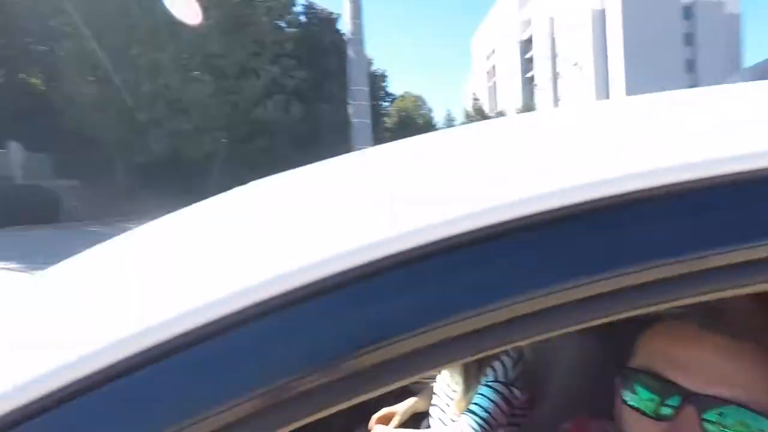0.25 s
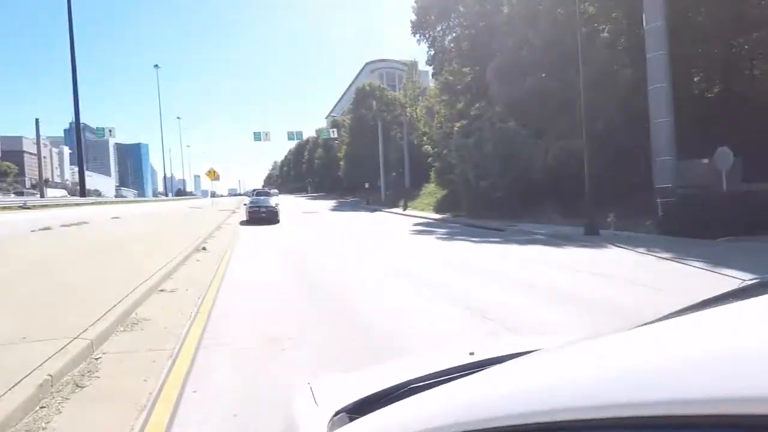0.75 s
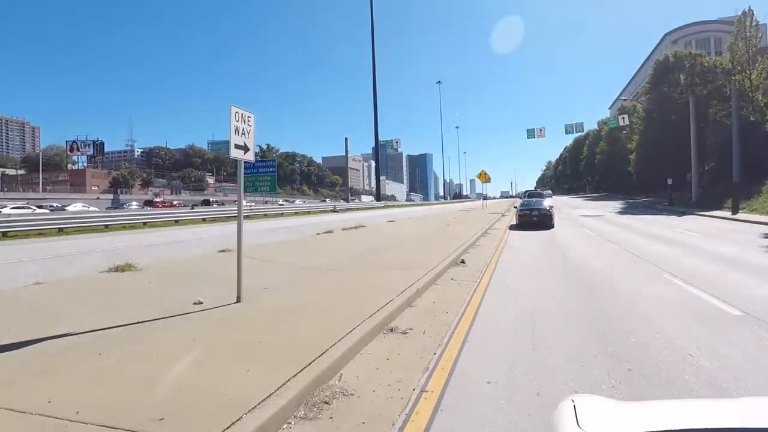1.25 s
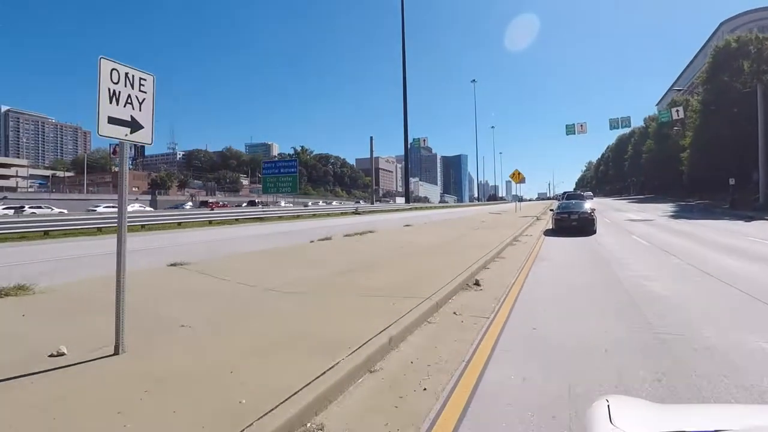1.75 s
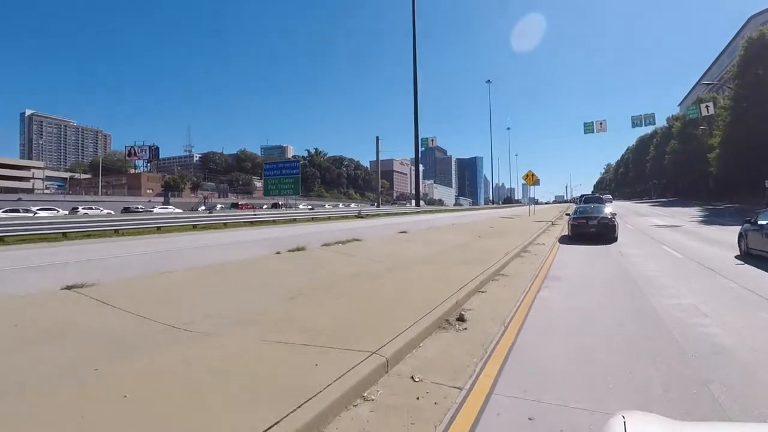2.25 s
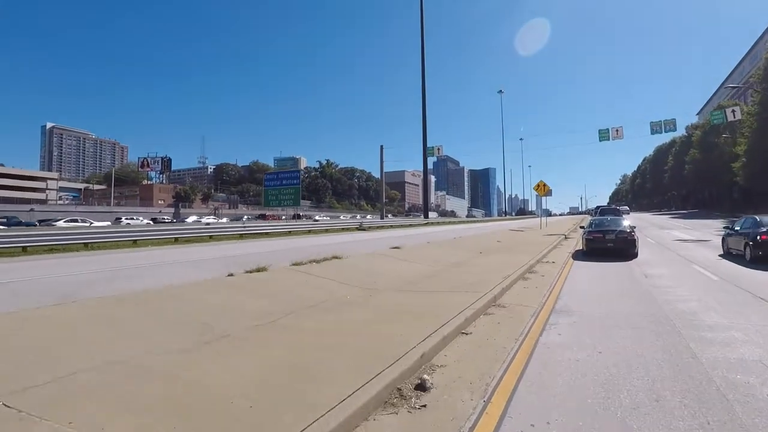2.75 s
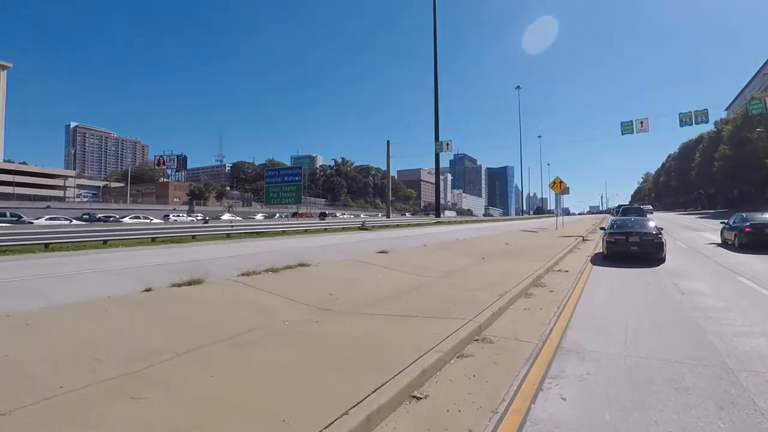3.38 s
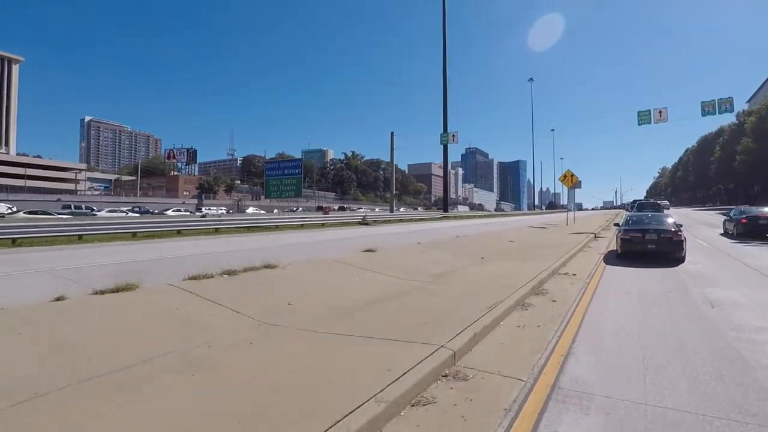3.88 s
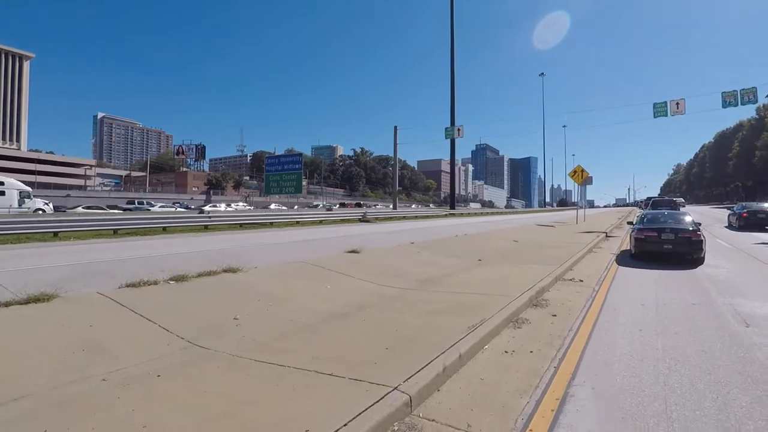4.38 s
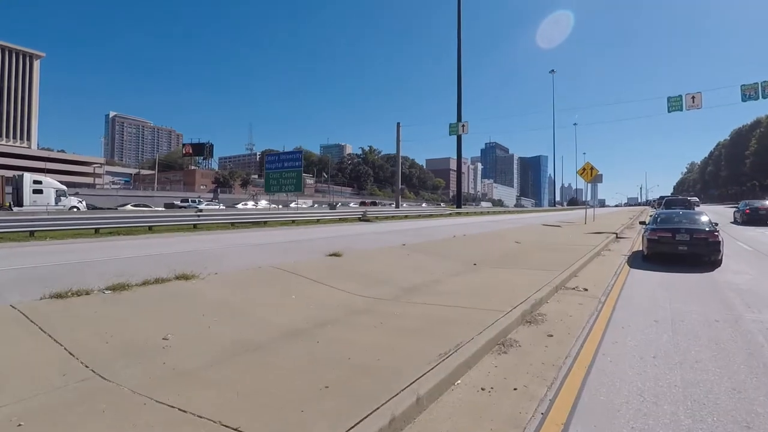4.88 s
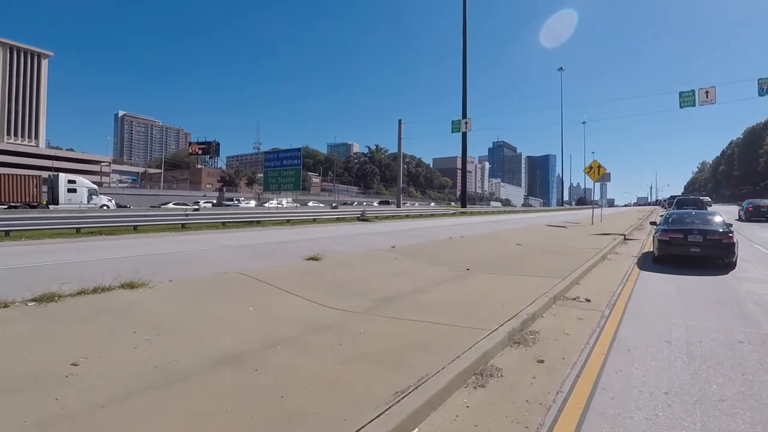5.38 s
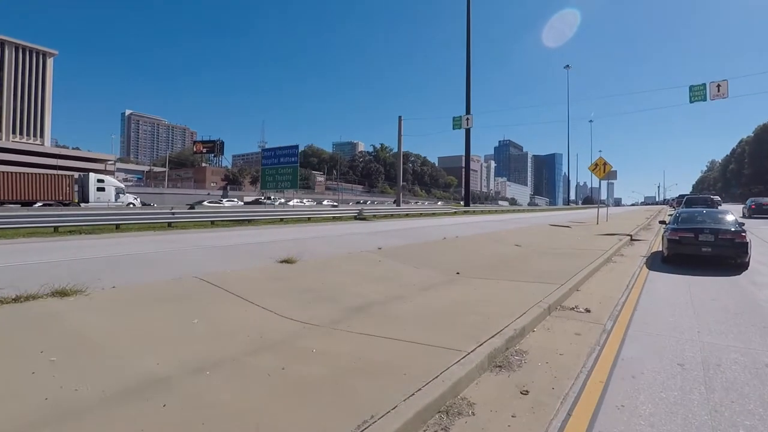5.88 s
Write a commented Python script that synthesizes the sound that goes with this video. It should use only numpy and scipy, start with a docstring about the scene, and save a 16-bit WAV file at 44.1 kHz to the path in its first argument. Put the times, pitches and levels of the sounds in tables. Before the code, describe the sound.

Wind dominates, heavy and bass-rich, pressing irregularly on an exposed microphone outdoors at the roadside. The strongest burst comes in the first half second, close to overload. A wavering engine idle and dull road rumble sit behind it. Soft tyre rushes rise after one second and again near five, separated by quieter traffic with faint high squeaks; a second engine revs up late.

```python
"""Camera held out of a van window beside a busy highway

Wind thumps and flutters on the microphone: coloured noise that follows lists of buffets and bursts, with one strong gust.
Tyre roar and hiss, heard as bands of noise, drone far away and swell as cars pass.
The van's idling engine is a stack of sine tones, a second engine revs up, and brakes squeak faintly.
The camera housing cuts two narrow notches into all but the wind, and the loudest peaks clip softly."""
import sys
import numpy as np
from scipy import signal
from scipy.fft import rfft, irfft, next_fast_len
from scipy.io import wavfile
from scipy.ndimage import uniform_filter1d, map_coordinates

SR = 44100
rng = np.random.default_rng(int(sys.argv[2]) if len(sys.argv) > 2 else 0)


def to_wav(s):
    """Save 16-bit WAV."""
    ch = np.atleast_2d(s).T  # columns
    pcm = np.round(np.clip(ch, -1, 1) * 32767)  # PCM
    wavfile.write(sys.argv[1], SR, pcm.astype(np.int16))


def convert_level_to_amplitude(level_db):
    """Map a level in decibels to its linear amplitude factor."""
    exponent = np.asarray(level_db, float) / 20
    return 10 ** exponent


N = 270024  # length in samples, about 6.12 s


def along(points, hz):
    """Reads a curve of (Hz, value) points on a log frequency axis."""
    f, v = np.transpose(points)
    return np.interp(np.log(hz + 1), np.log(f + 1), v)


def curves(rows):
    """One value per sample for each column after the time."""
    s, *cols = np.transpose(rows)
    return [np.interp(np.arange(N) / SR, s, c) for c in cols]


def unit(x):
    """Scaled to rms 1."""
    return x / np.sqrt(np.mean(x ** 2) + 1e-20)


def wobble(rate):
    """A smooth random curve through rate random points a second."""
    points = rng.standard_normal(int(N * rate / SR) + 4)
    return map_coordinates(points, [np.arange(N) * rate / SR])


def filtered(x, response):
    """x with its spectrum multiplied by a response, a function of frequency in Hz."""
    m = next_fast_len(N + SR // 2)  # spare room so that the end does not wrap to the start
    return irfft(rfft(x, m) * response(np.fft.rfftfreq(m, 1 / SR)), m)[..., :N]


def rush(spectrum, patchy_db):
    """Coloured noise of rms 1, silent outside its spectrum, with patches of random gain."""
    z = signal.stft(rng.standard_normal(N), nperseg=512)[2]
    field = uniform_filter1d(rng.standard_normal(z.shape), size=6, axis=0)
    field = uniform_filter1d(field, size=14, axis=1)
    patchy = signal.istft(z * convert_level_to_amplitude(patchy_db * unit(field)), nperseg=512)[1][:N]
    lowest, highest = spectrum[0][0], spectrum[-1][0]

    def colour(hz):
        return convert_level_to_amplitude(along(spectrum, hz)) * (hz > lowest) * (hz < highest)

    return unit(filtered(patchy, colour))


def steady(x, seconds, share):
    """Evens out the chance swells of narrow noise, so that the gusts set its level."""
    width = int(seconds * SR)
    power = np.abs(uniform_filter1d(uniform_filter1d(x ** 2, width), width))
    return unit(x / (power + 0.066) ** (np.clip(share, 0, 1) / 2))


def eddies(hz, spread):
    """Noise round a moving pitch, as wide as a share of that pitch: slow random sways read in turns."""
    turns = np.cumsum(hz) / SR
    knots = rng.standard_normal((2, 1200))
    sway = [map_coordinates(k, [turns * spread], mode="wrap") for k in knots]
    return unit(sway[0] * np.cos(2 * np.pi * turns) + sway[1] * np.sin(2 * np.pi * turns))


def lumps(rows):
    """Power of bell-shaped swells given as (s, peak dB, length s)."""
    t = np.arange(N) / SR
    return sum(convert_level_to_amplitude(2 * db) * np.exp(-(2 * (t - s) / length) ** 2) for s, db, length in rows)


def wind():
    """Eddies press on the membrane: deep thumps whose pitch wanders, a faster flutter, and one strong gust."""
    # Wind between the buffets. Each row: time in seconds, deep thump level, flutter level.
    # Both are in dB before they are stretched below.
    between = [(0, -11, -20.5), (.5, -18, -15.5), (1.0, -16.5, -18.5), (1.5, -12, -21), (1.95, -22, -12.5),
               (2.3, -21, -28.5), (2.6, -15.5, -21), (3.2, -16, -18), (4.0, -18, -18), (4.6, -15.5, -16.5),
               (5.2, -16.5, -13.5), (5.7, -21.5, -22), (6.12, -18, -29)]
    # Deep buffets; the thump's pitch glides from one to the next.
    # Each row: time in seconds, peak level in dB, length in seconds, pitch in Hz.
    buffets = [(0.117, -11, 0.074, 42.5), (0.41, -14, 0.075, 74.3), (0.831, -15, 0.076, 45.86),
               (1.148, -11, .15, 39.1), (1.461, -16, 0.097, 48.1), (1.802, -14, .07, 44.83),
               (2.005, -15, .12, 41.8), (2.297, -15, 0.16, 41.87), (2.636, -15, 0.072, 64.5),
               (2.993, -17, 0.06, 62), (3.594, -18.5, .1, 51.6), (4.248, -20, 0.17, 43.26),
               (4.657, -12.5, 0.1, 55.26), (4.806, -19, 0.053, 56.4), (5.155, -16, 0.14, 61.9),
               (5.702, -12.5, 0.068, 57.3), (5.928, -10.5, .07, 59.9), (6.053, -13, 0.089, 65.04)]
    # Bursts of flutter. Each row: time in seconds, peak level in dB.
    flaps = [(0.032, -9), (0.139, -11), (.29, -19.5), (.41, -6), (.61, -26), (0.821, -17.5), (1.031, -25),
             (2.14, -13), (2.41, -13.5), (2.579, -17), (4.3, -17.5), (4.8, -20), (5.15, -19), (6.11, -12.5)]
    # The gust as the camera is swung round; its eddies grow and slow down overall.
    # Each row: time in seconds, level in dB, pitch in Hz.
    gust_path = [(.19, -40, 290), (.24, -20, 240.2), (.29, -43, 260.4), (.32, -20.5, 300),
                 (.37, -15, 197.4), (.395, -7, 109.8), (.44, -12.5, 82.4), (.47, -42, 68.9)]
    # Colours of the thump and of the flutter. Each row: frequency in Hz, relative level in dB.
    deep_colour = [(8, -21), (18, -8.5), (28, 7), (45, -1), (75, -2), (110, -38)]
    flutter_colour = [(55, -38), (75, 8), (90, 0.5), (125, 2.5), (165, -9.5), (210, -43.5), (260, -85)]
    flap_s, sways_per_s = 0.068, 11

    thump_db, flutter_db = curves(between)
    thump_hz, = curves([(s, hz) for s, _, _, hz in buffets])
    thump = eddies(thump_hz, spread=0.4) + convert_level_to_amplitude(0.5) * rush(deep_colour, patchy_db=1.6)
    thump = steady(thump, 0.083, share=0.57)
    flutter = steady(rush(flutter_colour, patchy_db=-0.36), 0.042, share=0.75)
    gust_db, gust_hz = curves(gust_path)
    gust = steady(eddies(gust_hz, spread=0.7), 0.035, share=1.0)

    # A factor of 2 turns dB into power; the excess over 2 stretches the swings in level.
    thump_power = convert_level_to_amplitude(2.28 * (thump_db + 1.5 * wobble(sways_per_s)))
    thump_power = thump_power + lumps([row[:-1] for row in buffets])
    flutter_power = convert_level_to_amplitude(2.134 * (flutter_db + 1.5 * wobble(sways_per_s)))
    flutter_power = flutter_power + lumps([(s, db, flap_s) for s, db in flaps])
    return np.sqrt(thump_power) * thump + np.sqrt(flutter_power) * flutter + convert_level_to_amplitude(gust_db) * gust


def slap():
    """The sharpest eddy slaps the membrane: one short inward push."""
    # One row: time in seconds, peak level in dB, half width in seconds.
    sharpest = (.396, -8, .0011)
    s, db, width = sharpest
    return -convert_level_to_amplitude(db) * np.exp(-((np.arange(N) / SR - s) / width) ** 2)


def traffic():
    """Tyres near and far: upper bands swell as cars pass; all bands share a slight unevenness of the road."""
    # Upper tyre bands: high roar, whine, hiss, sizzle. Each row: far traffic in dB, passing car in dB,
    # delay of the peak in seconds, factor on the retreat time.
    upper_bands = [(-43.5, -38, -0.11, 3.25), (-47.5, -39, 0.18, 1.1), (-49, -39.5, 0.022, 0.92),
                   (-65.5, -51, -0.016, 1.03)]
    # Low drone, strongest while the camera is swung round.
    # Each row: time in seconds, body level in dB, edge level in dB.
    drone_level = [(0, -19.5, -33), (.19, -27, -36.5), (.37, -15, -27.5), (.51, -27, -35),
                   (.9, -26.5, -39.5), (1.05, -31.5, -38.5), (1.4, -27, -36), (1.65, -30, -39),
                   (2.6, -28, -40.5), (2.82, -31.5, -41.5), (3.1, -27.5, -40.5), (4.7, -27.5, -39.5),
                   (4.87, -24.5, -38), (5.3, -28, -37.5), (6.12, -24, -40)]
    # Low tyre roar. Each row: time in seconds, level in dB.
    low_roar_level = [(0, -39), (.4, -38.5), (.7, -42), (.86, -40.5), (1.1, -42), (2, -41), (3.1, -41),
                      (4.0, -41), (4.6, -38), (5.0, -37), (6.12, -34.5)]
    # Brief surges, as over a seam in the road.
    # Each row: time in seconds, dB over the bands before each band's share, length in seconds.
    surges = [(.86, -1, 0.055), (1.44, 0.5, 0.028), (3.4, -3.5, 0.052), (5.45, 2, 0.019)]
    # Colours of the bands. Each row: frequency in Hz, relative level in dB.
    drone_body = [(120, -53), (170, 4.5), (230, 1), (300, -4), (350, -17.5), (450, -59)]
    drone_edge = [(250, -37.5), (330, -1), (420, -4), (520, -7), (620, -16.5), (800, -61)]
    high_roar = [(800, -48), (1050, -11), (1300, -0.5), (1600, 0), (1950, -5), (2500, -44)]
    whine = [(1500, -47), (1950, 0), (2300, -1.5), (2700, -7), (3300, -16), (4200, -49)]
    hiss = [(2200, -39), (3200, -7), (4150, -0.5), (5500, -0.5), (6700, -2.5), (7500, -11.5), (9000, -51)]
    sizzle = [(5500, -57), (7300, 5.5), (8500, 2), (10000, -3.5), (11500, -14), (13000, -35), (14500, -73)]

    road = wobble(5.5)
    levels = curves(drone_level) + curves(low_roar_level)
    levels += [passing(step, *band) for step, band in enumerate(upper_bands)]
    noises = [rush(drone_body, patchy_db=0.33), rush(drone_edge, patchy_db=1.07), low_roar(patchy_db=1.0),
              rush(high_roar, patchy_db=0.46), rush(whine, patchy_db=0.66),
              rush(hiss, patchy_db=0.8), rush(sizzle, patchy_db=1.5)]
    # One value per band, from the drone up to the sizzle.
    road_db = [0.095, 0.15, 0.24, 0.2, 0.23, 0.28, 0.4]
    seam_share = [0.05, 0.3, 0.58, 0.88, 0.51, 0.19, 0.4]
    seams = lumps(surges)
    return sum(convert_level_to_amplitude(db + r * road) * np.sqrt(1 + share * seams) * noise
               for db, noise, r, share in zip(levels, noises, road_db, seam_share))


def passing(step, far_db, near_db, late_s, linger):
    """Level of one tyre band in dB: far traffic plus cars whose power falls with distance."""
    # Cars passing the microphone. Each row: time when nearest in seconds, level in dB,
    # approach time in seconds, retreat time in seconds before the band's factor, brightness in dB per band step.
    cars_near = [(.25, -14, 0.37, 0.13, 1.8), (1.17, -3, 0.17, 0.39, 0.74), (1.45, -3, 0.16, 0.53, -0.3),
                 (4.82, -3.5, 0.091, 0.13, 1), (5.081, 0.5, .13, 0.21, 0.65), (5.62, -0.5, .3, .6, -1)]
    shield = 1.62  # the van's body hides a car until it is close: the approach is this much steeper
    t = np.arange(N) / SR - late_s
    power = convert_level_to_amplitude(2 * far_db)
    for s, db, come_s, go_s, bright_db in cars_near:
        approach = (1 + ((t - s) / come_s) ** 2) ** shield
        retreat = 1 + ((t - s) / (linger * go_s)) ** 2
        power = power + convert_level_to_amplitude(2 * (near_db + db + bright_db * step)) / np.where(t < s, approach, retreat)
    return 10 * np.log10(power)


def low_roar(patchy_db):
    """Low tyre roar: a dull and a bright noise cross-faded by the tilt as the camera turns to the road."""
    # Each row: time in seconds, tilt that sets the mix, from -6 (all dull) to 6 (all bright).
    tilt_path = [(0, -4.5), (.9, -7), (2, -1.5), (4, 1.5), (6.12, 6)]
    # Colour before the tilt. Each row: frequency in Hz, relative level in dB.
    roar_colour = [(400, -50), (560, -10.5), (700, -3), (870, 0.5), (1000, -5), (1200, -21.5),
                   (1500, -64.5)]
    tilt, = curves(tilt_path)
    bright = np.clip((tilt + 6) / 12, 0, 1)
    pair = []
    for slope in (-6, 6):  # dB per octave round 800 Hz
        tilted = [(hz, db + slope * np.log2(hz / 800)) for hz, db in roar_colour]
        pair.append(rush(tilted, patchy_db))
    return np.sqrt(1 - bright) * pair[0] + np.sqrt(bright) * pair[1]


def engines():
    """Idle tones waver together in speed and each in strength; a second engine revs up."""
    # Tones of the idling engine. Each row: multiple of the half-turn rate, rms level in dB at first, rms level
    # in dB once the camera has turned.
    idle_tones = [(2, -23.5, -26.5), (3, -27.5, -27), (5, -24.5, -28), (6, -25, -24), (8, -33.5, -28.5),
                  (9, -35, -41.5), (11, -47, -38), (12, -44.5, -36), (14, -49, -53.5), (15, -38.5, -52)]
    # A car pulling away alongside. Each row: time in seconds, firing rate in Hz, rms level in dB.
    pull_away = [(4.5, 125.6, -51), (4.95, 129.7, -29), (5.2, 134.5, -20.5), (5.6, 137.9, -22),
                 (5.9, 141.2, -22.5), (6.12, 141.9, -23.5)]
    idle_hz = 19.4  # mean half-turn rate
    t = np.arange(N) / SR
    phase = 2 * np.pi * np.cumsum(idle_hz * (1 + 0.00601 * wobble(1.487))) / SR
    turned = np.clip((t - 2.4) / 1.7, 0, 1)
    idle = 0
    for k, first_db, late_db in idle_tones:
        db = first_db + turned * (late_db - first_db) + 2.3 * wobble(3.002)
        idle = idle + convert_level_to_amplitude(db) * np.sin(k * phase + rng.uniform(0, 2 * np.pi))
    hz, db = curves(pull_away)
    pulling = convert_level_to_amplitude(db + 1.3 * wobble(6)) * np.sin(2 * np.pi * np.cumsum(hz) / SR)
    pulling = pulling * (t > pull_away[0][0])
    return np.sqrt(2) * (idle + pulling)  # from rms to peak


def squeaks():
    """Brake pads grab and slip: short high tones that flutter in strength and pitch."""
    # Each row: time of the middle in seconds, frequency in Hz, peak level in dB, length in seconds.
    squeak_list = [(2.436, 6200, -43, 0.027), (2.458, 6520, -49, 0.049), (2.913, 6960, -44, 0.055),
                   (2.921, 6390, -44, 0.039), (3.396, 6510, -45, 0.033), (3.413, 8215, -52, 0.019),
                   (4.154, 6960, -44, 0.01), (4.156, 6180, -48, 0.011), (4.169, 7640, -46, 0.023)]
    t = np.arange(N) / SR
    total = 0
    for s, hz, db, length in squeak_list:
        swell = convert_level_to_amplitude(db + 2.9 * wobble(160.7)) * np.exp(-(2 * (t - s) / length) ** 2)
        total = total + swell * np.sin(2 * np.pi * hz * t + 1.1 * wobble(330))
    return total


def scene():
    """Airborne sound enters through the housing and its notches; wind presses on the membrane directly."""
    # Housing notches. Each row: centre in Hz, width in Hz, depth as a share from 0 to 1.
    notches = [(559, 110, 1), (1106, 88, 0.52)]

    def housing(f):
        return np.prod([1 - d * 1j * f * w / (c * c - f * f + 1j * f * w) for c, w, d in notches], axis=0)

    airborne = filtered(engines() + traffic() + squeaks(), housing)
    return (airborne + wind() + slap())[None]  # one channel


def top_cut(x):
    """Nothing passes above the cut-off."""
    return signal.sosfilt(signal.butter(12, 15260, fs=SR, output="sos"), x)


def record(dry):
    """Adds the microphone's own hiss, then clips softly near full scale."""
    # Colour of the hiss. Each row: frequency in Hz, relative level in dB.
    hiss_colour = [(6000, -36), (9000, 3), (11000, -2.5), (12800, -5.5), (14000, -7.5), (15000, -17),
                   (16000, -40)]
    x = dry + convert_level_to_amplitude(-63.5) * rush(hiss_colour, patchy_db=-0.5)
    x = x / (1 + np.abs(x / 1.02) ** 8) ** (1 / 8)
    return top_cut(x)


dry = scene()
out = record(dry)
to_wav(out)
```